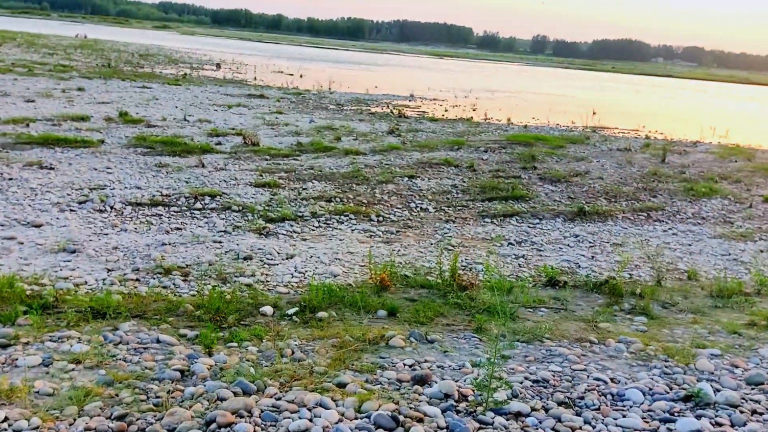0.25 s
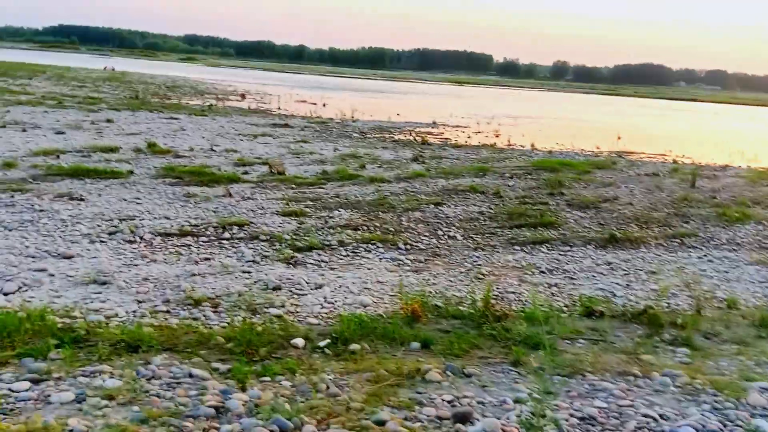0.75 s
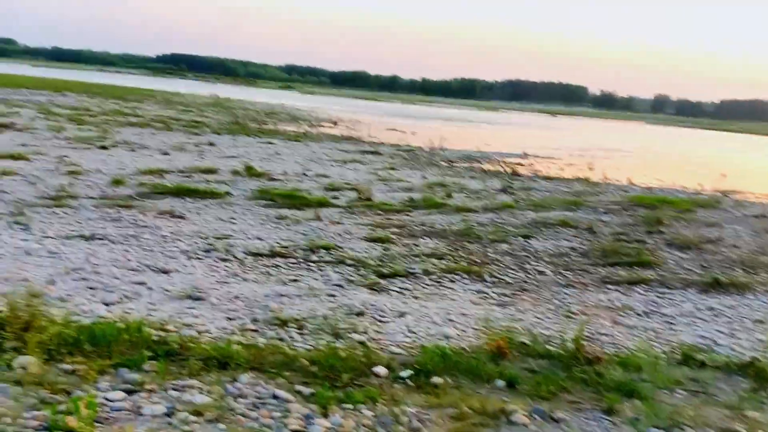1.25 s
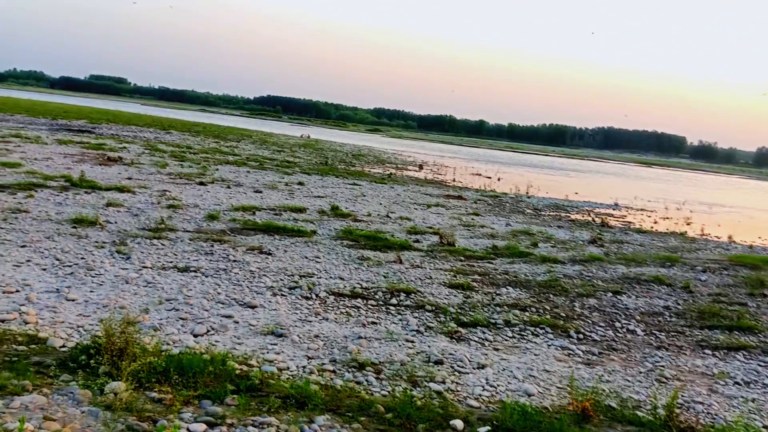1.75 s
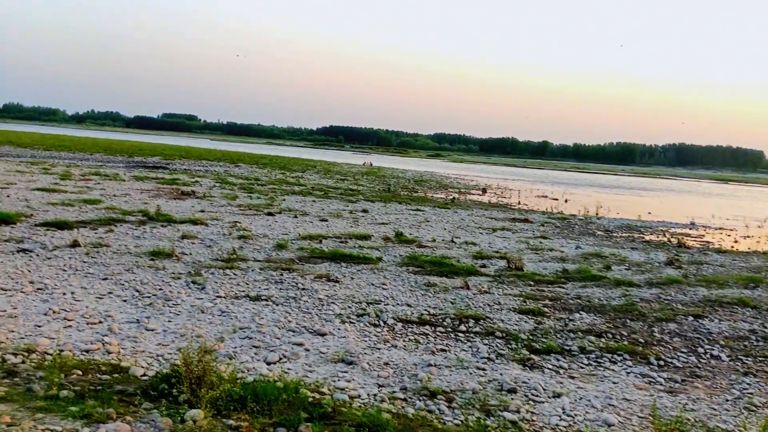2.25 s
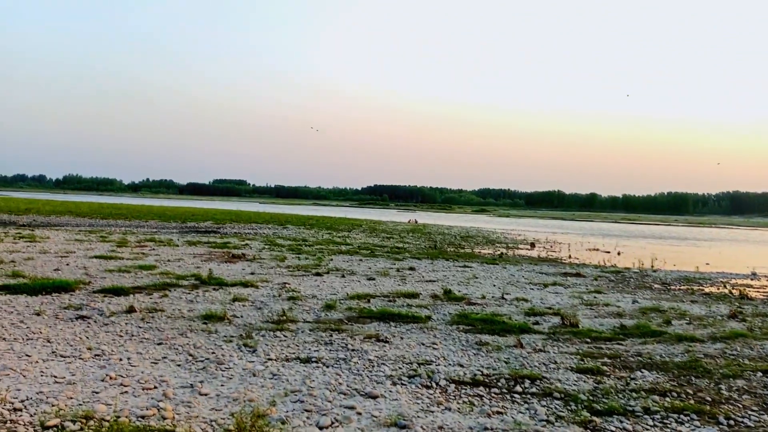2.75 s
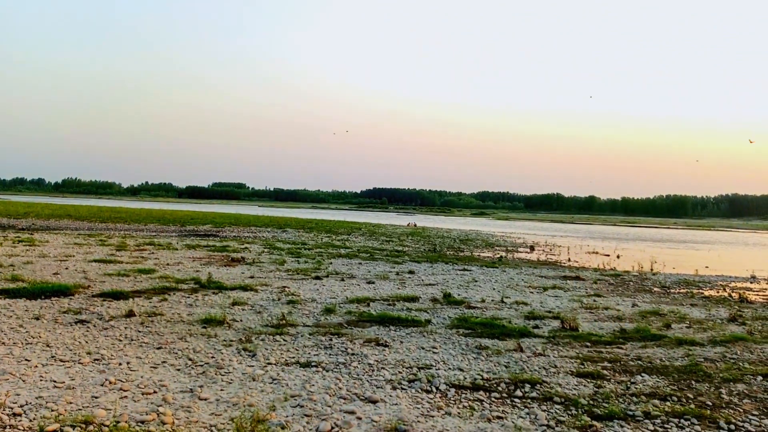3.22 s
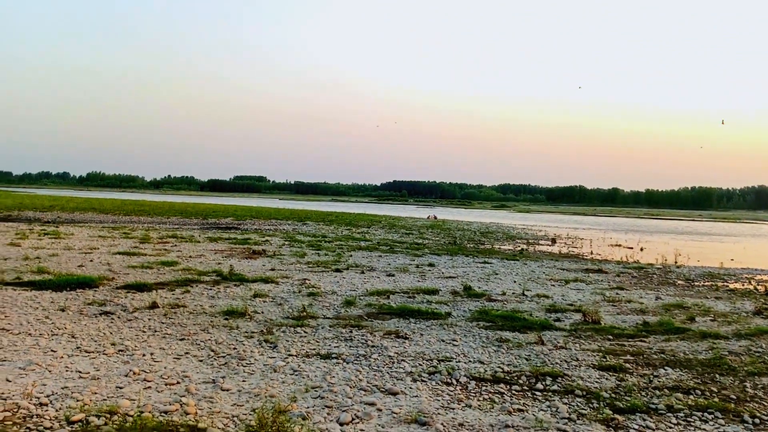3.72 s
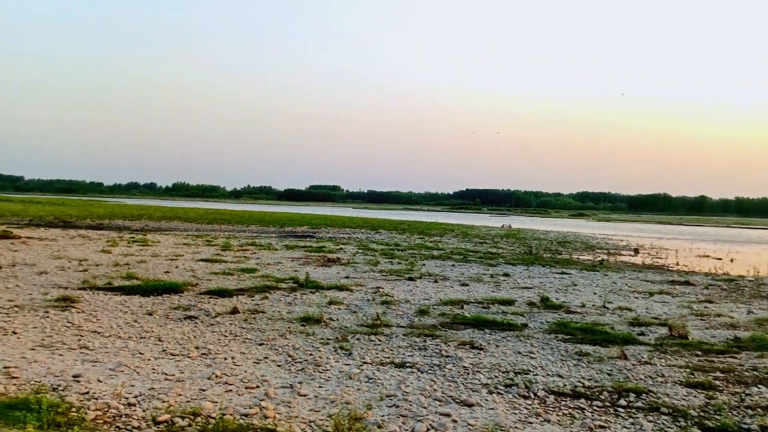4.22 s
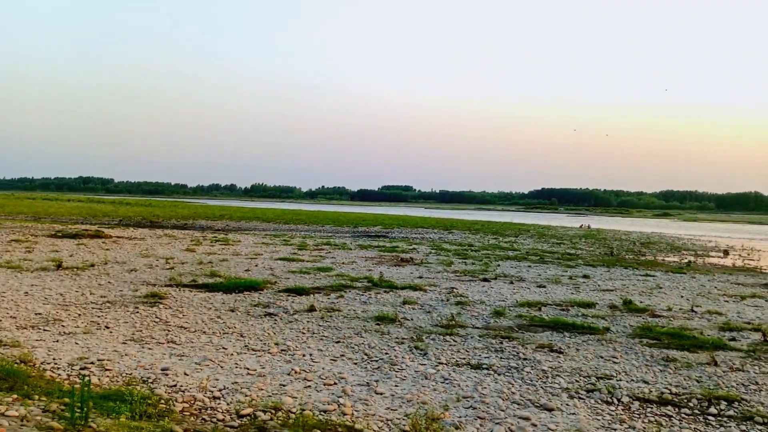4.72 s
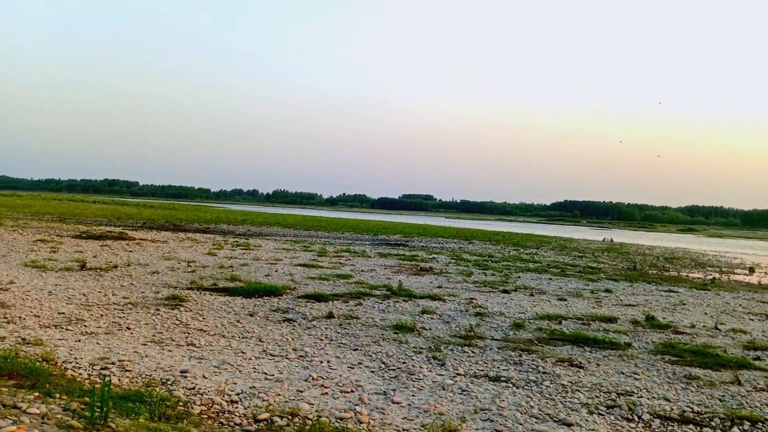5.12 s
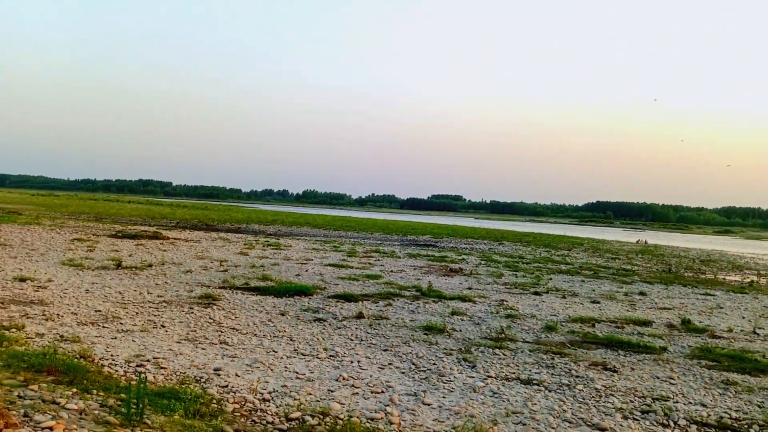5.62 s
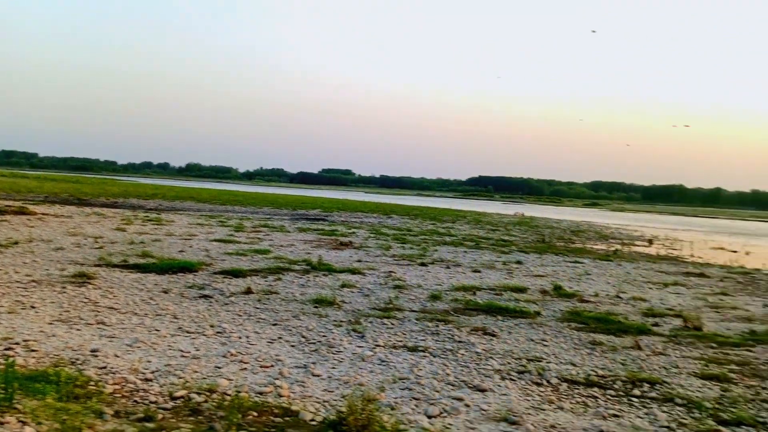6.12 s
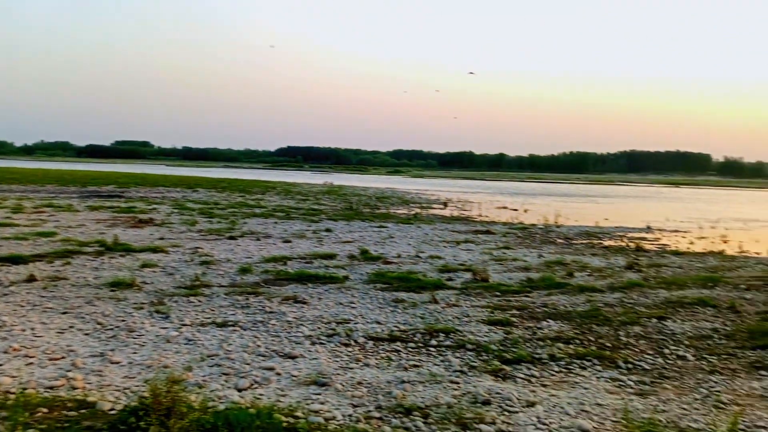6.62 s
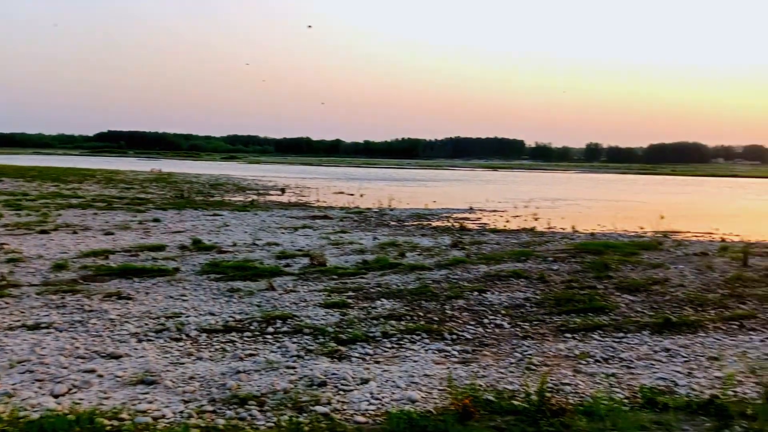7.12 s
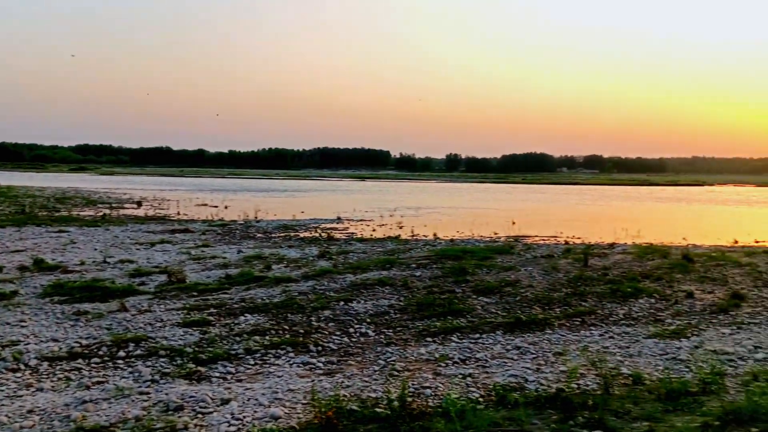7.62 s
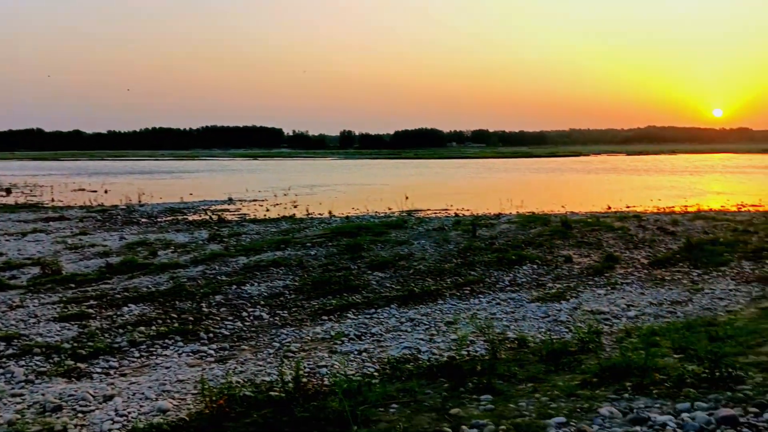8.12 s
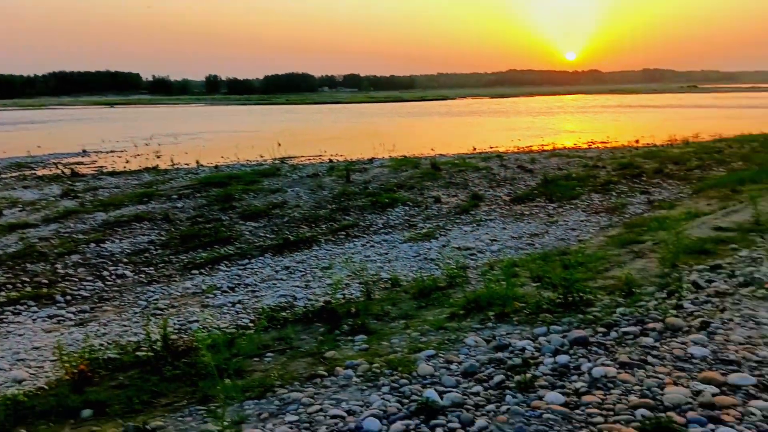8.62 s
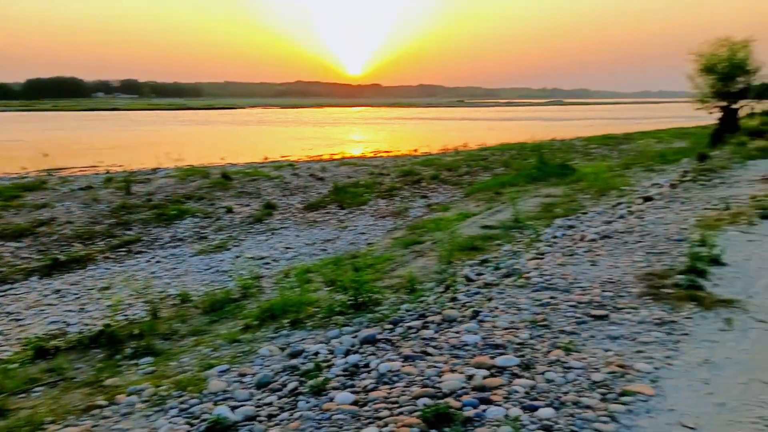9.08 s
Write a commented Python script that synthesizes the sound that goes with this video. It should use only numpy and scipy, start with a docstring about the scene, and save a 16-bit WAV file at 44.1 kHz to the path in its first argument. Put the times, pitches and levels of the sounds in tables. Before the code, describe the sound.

Harsh squawks and piercing bird calls overlap across a river at dusk, while crickets buzz and gusts rumble and howl at the microphone.

```python
"""Harsh cries of a far water-bird colony overlap at dusk on a gravel river bank: rough tones over a chance murmur.
Bush crickets buzz as pulsed narrow noise over the coloured noise of river and distant air. Gusts rumble and howl
low in the phone's microphone port; close by, brushing noise, short pebble knocks and dull hand bumps.
Thin squeaks arch up on nearly clean tones, and later one small bird whistles two falling notes."""
import sys
import numpy as np
from scipy import signal
from scipy.fft import rfft, irfft
from scipy.io import wavfile
from scipy.ndimage import uniform_filter1d

SR = 44100
rng = np.random.default_rng(int(sys.argv[2]) if len(sys.argv) > 2 else 0)


def bounce(signal):
    """Save signal as a 16-bit WAV file at the path given by the first command-line argument."""
    frames = np.transpose(np.atleast_2d(signal))
    limited = np.clip(frames, -1, 1)
    pcm = np.round(limited * 32767).astype(np.int16)
    wavfile.write(sys.argv[1], SR, pcm)


def volts(x):
    """Linear amplitude factor 10**(x/20) for a level x in dB, scalar or array-like."""
    e = np.asarray(x, float) / 20
    return 10 ** e


N = 412335  # samples


def in_time(rows, outside=None):
    """Columns joined by straight lines over time, one value a sample."""
    s, *columns = np.transpose(rows)
    return [np.interp(np.arange(N) / SR, s, c, left=outside, right=outside) for c in columns]


def rms_one(x):
    """Scale to rms 1."""
    return x / np.sqrt(np.mean(x ** 2) + 1e-20)


def band(x, low_hz, high_hz, order=2):
    """Butterworth band-pass."""
    return signal.sosfilt(signal.butter(order, [low_hz, high_hz], "band", fs=SR, output="sos"), x)


def drift(rate_hz, size=N):
    """Chance that wanders about rate_hz times a second: twice-smoothed noise of rms 1."""
    r = np.exp(-2 * np.pi * rate_hz / SR)
    settling = 4000  # samples thrown away
    wander = signal.lfilter([1], [1, -2 * r, r * r], rng.standard_normal(size + settling))
    return rms_one(wander[settling:])


def coloured(spectrum, low_hz, high_hz):
    """Noise with the given spectrum (Hz, relative dB), rms 1 between low_hz and high_hz."""
    hz = np.fft.rfftfreq(N, 1 / SR) + 1
    at, level_db = np.transpose(spectrum)
    gain = volts(np.interp(np.log(hz), np.log(at), level_db))
    x = irfft(rfft(rng.standard_normal(N)) * gain, N)
    return x / np.sqrt(np.mean(band(x, low_hz, high_hz) ** 2))


def mottled(x, spread_db):
    """Sound made uneven: its level varies by chance in small patches of pitch and time."""
    spectrum = signal.stft(x, nperseg=512)[2]
    chance = uniform_filter1d(rng.standard_normal(spectrum.shape), size=3, axis=0)
    chance = uniform_filter1d(chance, size=6, axis=1)
    return signal.istft(spectrum * volts(spread_db * rms_one(chance)), nperseg=512)[1][:N]


def harsh_voice(hz, rough_hz, throb_hz, depth):
    """A tone whose pitch jitters, wider and faster the rougher, and whose level throbs as the membranes flap."""
    size = len(hz)
    jittered_hz = hz + rough_hz * drift(50 + rough_hz, size)
    tone = np.sin(2 * np.pi * np.cumsum(jittered_hz) / SR)
    throb_turns = np.cumsum(throb_hz * (1 + 0.074 * drift(24.0, size))) / SR + rng.random()
    throb = 1 + depth * np.sin(2 * np.pi * throb_turns)
    return rms_one(tone * throb * volts(1.7 * drift(38.0, size)))


def cries(table):
    """Each partial comes in fast, bends in pitch and fades."""
    out = np.zeros(N + SR)
    for start, length, first_hz, last_hz, level_db, rough_hz in table:
        part = np.arange(round(length * SR)) / (length * SR)
        hz = first_hz + (last_hz - first_hz) * (1 - (1 - part) ** 1.3)  # bends most at first
        # a quick onset (slower for raspy partials) to most of the strength, then a swell
        onset = np.minimum(part * length / (0.0023 + rough_hz / 63000.0), 1)
        swell = np.minimum(0.88 + part / 0.9, 1)
        fade = np.minimum((1 - part) / 0.4, 1)
        voice = harsh_voice(hz, max(rough_hz, 5), throb_hz=rng.uniform(64, 78), depth=0.5)
        out[round(start * SR):][:len(part)] += volts(level_db) * onset * swell * fade * voice
    return out[:N]


def plain_cries():
    """Cries of a single tone, rougher the higher they are pitched."""
    # one-tone cries: start_s, length_s, first_hz, last_hz, level_db
    plain = [(0.0, 0.16, 1984, 1825, -44.5), (0.761, 0.047, 1414, 1444, -44.5),
             (0.809, 0.21, 1773, 1700, -48.5), (1.105, 0.068, 1358, 1466, -39),
             (1.108, 0.093, 1905, 2085, -45), (1.509, 0.11, 4880, 4980, -63),
             (1.698, 0.27, 1351, 1685, -39.5), (1.787, 0.15, 1093, 1016, -52.5),
             (2.366, 0.39, 1640, 1705, -49), (2.553, 0.39, 1357, 1386, -41.5),
             (2.568, 0.17, 2353, 2840, -45.5), (2.842, 0.17, 1226, 1007, -39),
             (2.881, 0.16, 1557, 1437, -42.5), (3.036, 0.16, 1467, 1493, -45.5),
             (3.21, 0.1, 1425, 1405, -43), (3.3, 0.21, 1420, 1218, -50), (3.658, 0.12, 1533, 1612, -45),
             (4.12, 0.13, 1605, 1567, -36.5), (4.259, 0.24, 1860, 1760, -46.5),
             (4.288, 0.092, 1480, 1520, -48.5), (4.4, 0.077, 2690, 2670, -57),
             (4.552, 0.21, 1870, 1920, -42.5), (4.671, 0.06, 1560, 1460, -33),
             (5.14, 0.08, 1480, 1454, -50), (5.614, 0.12, 970, 985, -51.5), (5.83, 0.2, 1477, 1378, -50.5),
             (6.082, 0.23, 1465, 1440, -50.5), (6.471, 0.15, 1422, 1400, -46),
             (6.941, 0.084, 910, 883, -47.5), (7.058, 0.17, 1666, 1900, -46.5),
             (7.232, 0.21, 1663, 1563, -45), (7.417, 0.072, 2720, 2760, -51.5),
             (7.714, 0.092, 1937, 1890, -44.5), (7.956, 0.2, 1517, 1507, -42.5),
             (7.973, 0.17, 1805, 2054, -41), (8.123, 0.14, 1270, 1326, -46.5),
             (8.213, 0.089, 888, 858, -51), (8.531, 0.27, 1728, 1800, -49), (8.969, 0.11, 1905, 1900, -41),
             (9.21, 0.13, 1916, 1970, -48.5)]
    return [(s, length, first, last, db, 0.021 * first) for s, length, first, last, db in plain]


def squawks():
    """Harsh squawks: a cluster of rough tones around the pitch, with raspy tones well above it."""
    # squawks: start_s, length_s, first_hz, last_hz, level_db, rasp_db (relative to level_db)
    calls = [(0.222, 0.22, 1784, 1761, -44.5, -37), (1.66, 0.29, 1780, 1850, -43.5, -25),
             (2.641, 0.4, 1900, 1600, -40, -24.5), (3.294, 0.23, 1763, 1763, -39.5, -32),
             (3.921, 0.29, 1804, 1944, -47.5, -33), (4.667, 0.35, 1910, 1690, -37, -40.5),
             (5.474, 0.29, 1882, 1687, -41.5, -32), (5.698, 0.33, 1873, 1780, -46, -28),
             (6.597, 0.24, 1782, 1887, -44.5, -24), (6.851, 0.27, 1816, 1750, -35.5, -21),
             (7.251, 0.36, 1900, 1790, -43.5, -28), (7.499, 0.29, 1828, 1730, -34.5, -27.5),
             (8.125, 0.26, 1825, 1740, -34.5, -38)]
    # cluster: share of the pitch, level_db (relative), roughness_hz, share of length left out at each end
    cluster = [(0.81, -4.5, 60, 0.06), (1.0, 1, 50, 0.0), (1.14, -6.5, 65, 0.1), (1.26, -15, 70.6, 0.22)]
    # rasp: the same columns
    rasp = [(1.8, -6, 90, 0.15), (2.25, -5.5, 70, 0.05), (2.5, -6, 70, 0.1), (3.1, -3.5, 70, 0.1),
            (3.55, -4, 60, 0.05), (2.6, -2.5, 1196, 0.01)]
    tones = []
    for s, length, first, last, db, rasp_db in calls:
        for group, group_db in [(cluster, db), (rasp, db + rasp_db)]:
            tones += [(s + wait * length, (1 - 2 * wait) * length, k * first, k * last, group_db + tone_db, rough)
                      for k, tone_db, rough, wait in group]
    return tones


def piercing_cries():
    """Cries with two overtones, the octave and a twelfth 15 dB weaker than the octave."""
    # piercing cries: start_s, length_s, first_hz, last_hz, level_db, octave_db (relative to level_db)
    piercing = [(1.722, 0.17, 1890, 2014, -49.5, -7), (2.6, 0.23, 1953, 2250, -45, -6),
                (3.296, 0.147, 2140, 2220, -40.5, -14.5), (6.611, 0.14, 2225, 2293, -44, -13),
                (6.874, 0.146, 1980, 2100, -38, -22), (7.508, 0.21, 2030, 2230, -47.5, -9),
                (8.102, 0.26, 1994, 2097, -50.5, -17)]
    tones = []
    for s, length, first, last, db, octave_db in piercing:
        levels = [db, db + octave_db, db + octave_db - 15.0]
        tones += [(s, length, k * first, k * last, level, 60.0) for k, level in enumerate(levels, 1)]
    return tones


def far_cries(count, low_hz, high_hz, length_s, level_db):
    """Chance cries from the far end of the colony, up to 8.6 dB below level_db."""
    when, long, pitch, bend, loud = rng.random((count, 5)).T
    hz = low_hz * (high_hz / low_hz) ** pitch
    last_hz = hz * (1 + 0.0815 * (bend - 0.5))
    rough_hz = 25 + 0.0081 * hz
    return np.transpose([when * N / SR, length_s * (0.5 + long), hz, last_hz, level_db - 8.6 * loud, rough_hz])


def colony():
    """Near cries, the far murmur with a faint higher twitter, and weaker echoes off the other bank."""
    # how busy the far colony is: time_s, gain_db
    bustle = [(0, 2.5), (0.6, -2.5), (1.3, 0.5), (2.2, -3.5), (3.0, -1.5), (4.3, 3), (5.25, -2), (5.8, 4.5),
              (6.3, -4.5), (7.2, 2.1), (7.9, 1.5), (8.7, -1), (9.35, -1.5)]
    murmur = cries(far_cries(count=220, low_hz=1313, high_hz=2100, length_s=0.122, level_db=-53.0))
    murmur = volts(in_time(bustle)[0]) * murmur
    twitter = cries(far_cries(count=420, low_hz=2250, high_hz=6890, length_s=0.042, level_db=-74.5))
    voices = cries(plain_cries() + squawks() + piercing_cries()) + murmur + twitter
    echoes = sum(volts(db) * np.roll(voices, round(s * SR)) for s, db in [(0.013, -12), (0.047, -9)])
    return voices + echoes


def cricket(strokes_hz, low_hz, high_hz, gap_db):
    """Each wing stroke is a noise burst of tooth strikes in the wing's narrow band, with a second return stroke."""
    turn = 2 * np.pi * (np.cumsum(strokes_hz * (1 + 0.012 * drift(5.1))) / SR + rng.random())
    stroke = volts(gap_db * (np.cos(turn) - 1) / 2)
    return_stroke = 0.61 * volts(gap_db * (np.cos(turn - 2.4) - 1))  # weaker and narrower
    strikes = (stroke + return_stroke) * rng.standard_normal(N)
    return rms_one(band(strikes, low_hz, high_hz, order=4)) * volts(2.0 * drift(8.5))


def crickets():
    """Two singers share the low band, a third sings higher, a fourth is barely there."""
    # levels of the buzz as heard at the microphone, dips included: time_s, low_singers_db, high_singer_db
    buzz_levels = [(0, -54, -76), (.45, -56, -60), (.65, -53, -77), (1.15, -53.5, -76), (1.24, -69, -84),
                   (1.55, -51, -63), (2.08, -62.5, -71), (2.42, -50.5, -74), (3.1, -55, -69.5),
                   (3.4, -50, -66), (4.55, -50, -68), (4.84, -55.5, -78), (5.25, -51, -68), (6.5, -49, -62),
                   (7.71, -51.5, -66), (8.0, -47.5, -61.5), (8.5, -51.5, -60.5), (8.7, -49, -76),
                   (9.1, -47, -59.5)]
    low_db, high_db = in_time(buzz_levels)
    low = cricket(66.2, low_hz=7410, high_hz=8090, gap_db=16.0)
    low = low + 0.73 * cricket(62.5, low_hz=7272, high_hz=7980, gap_db=7)
    high = cricket(60.8, low_hz=9020, high_hz=9580, gap_db=14.0)
    faint = cricket(57.0, low_hz=10700, high_hz=10930, gap_db=10)
    singers = volts(low_db) * rms_one(low) + volts(high_db) * (high + volts(-17.5) * faint)
    return mottled(singers, spread_db=1.0)


def distant_air():
    """River and distant air: coloured noise whose level moves slowly, mottled in pitch and time."""
    # spectrum: frequency_hz, level_db per Hz (relative)
    air_spectrum = [(100, -14), (160, 0.5), (260, -9), (1050, -13), (1500, -6), (1900, -8), (2600, -18),
                    (6300, -28.5), (9000, -25), (10500, -34.5), (15800, -40.5)]
    # course of the level, ahead of a 3.5 dB cut: time_s, level_db
    air_level = [(0, -66), (2.4, -65), (3.6, -63), (5.2, -62), (5.8, -59.5), (7.4, -61), (8.4, -63.5),
                 (9.35, -63.5)]
    hiss = mottled(coloured(air_spectrum, 2865, 7400), spread_db=4.0)
    return volts(in_time(air_level)[0] - 3.5) * hiss


def gust(start, length):
    """A gust catches and lets go of the port within a few hundredths of a second."""
    t = np.arange(N) / SR
    return np.clip(np.minimum(t - start, start + length - t) / 0.028, 0, 1)


def wind_rumble():
    """Lumpy turbulence at the microphone port: low noise under gusts and a faint steady breeze."""
    # rumbling gusts: start_s, length_s, level_db
    gusts = [(0.08, 0.24, -51), (0.731, 0.18, -44.5), (1.224, 0.18, -53), (2.554, 0.25, -42),
             (3.571, 0.38, -36.5), (4.088, 0.43, -38.5), (4.543, 0.65, -37), (5.385, 0.3, -42),
             (5.717, 0.56, -38), (6.589, 0.14, -45), (6.85, 0.099, -54), (7.299, 0.26, -36.5),
             (7.62, 0.18, -40.5), (7.824, 0.25, -39), (8.31, 0.12, -45), (8.873, 0.23, -44.5)]
    # turbulence spectrum: frequency_hz, level_db per Hz (relative)
    turbulence = [(18, -72.5), (30, -33.5), (128, 3.5), (169, -2), (260, -28.5), (340, -60), (570, -120)]
    breeze = volts(-57.5 + 1.77 * drift(6.7))
    blown = sum(volts(db) * gust(s, length) for s, length, db in gusts) + breeze
    return blown * volts(2.0 * drift(8.0)) * coloured(turbulence, 54, 260)


def wind_howls():
    """Stronger gusts make the port howl: noise in a narrow band, over a faint howl that wavers in level."""
    # howling gusts: start_s, length_s, level_db, pitch_hz
    gusts = [(1.896, 0.17, -36.5, 342), (1.981, 0.037, -42.5, 690), (2.055, 0.29, -44.5, 329),
             (3.525, 0.12, -52.5, 326), (3.875, 0.069, -52, 620), (4.64, 0.11, -57.5, 323),
             (5.061, 0.18, -45.5, 646), (5.29, 0.14, -57.5, 335), (5.436, 0.81, -43.5, 336),
             (5.83, .08, -56, 620), (6.592, 0.12, -51, 338), (6.858, 0.55, -40, 345),
             (7.49, 0.062, -44, 330), (7.621, .21, -40, 349), (7.91, 0.14, -59.5, 342)]
    white = rng.standard_normal(N) * volts(0.82 * drift(8.4))
    howls = np.zeros(N)
    for s, length, db, hz in gusts:
        howls += volts(db) * gust(s, length) * rms_one(band(white, 0.907 * hz, 1.028 * hz))
    calm = volts(-67.5 + 5.0 * drift(3.0)) * rms_one(band(white, 282, 355))
    return howls + calm


def brushing():
    """Sleeve, hand and grass brush close to the microphone: grainy noise with a high sheen and a lower body."""
    # brushes: start_s, length_s, sheen_db, body_db (relative to sheen_db)
    brushes = [(0.09, 0.039, -66, -12), (.15, 0.09, -66, -16), (0.294, 0.062, -56, -12.5),
               (0.357, 0.064, -57, -11.5), (0.515, 0.1, -68, -17), (0.745, 0.07, -61.5, -13),
               (1.127, 0.1, -64, -5.5), (1.48, 0.3, -69.5, -7), (1.83, 0.67, -66.5, -11.5),
               (1.868, 0.51, -72.5, 2.5), (1.968, 0.083, -71, 6), (5.98, 0.52, -66.5, -12)]
    # cloth spectrum: frequency_hz, level_db per Hz (relative)
    cloth_spectrum = [(500, -12.5), (1800, -5), (3000, -22.5), (5100, -9), (7000, -18), (15800, -33.5)]
    t = np.arange(N) / SR
    grain = volts(2.0 * drift(300) + 2.0 * drift(13))
    noise = grain * coloured(cloth_spectrum, 10000, 17700)
    body, sheen = band(noise, 420, 9300), band(noise, 8340, 14900)
    cloth = np.zeros(N)
    for s, length, db, body_db in brushes:
        rise, fall = (t - s) / (0.006 + 0.065 * length), (s + length - t) / (0.23 * length)
        stroke = np.clip(np.minimum(rise, fall), 0, 1)
        cloth += volts(db) * stroke * (sheen + volts(body_db) * body)
    return cloth


def pebbles():
    """Pebbles knock: a noise crack with a short gritty tail."""
    # knocks, ahead of the band-pass: start_s, level_db
    pebble_knocks = [(0.45, -42), (0.7903, -34.5), (1.174, -33)]
    knocks, t = np.zeros(N + SR), np.arange(SR // 10) / SR
    burst = np.exp(-t / 0.0008) + volts(-11) * np.exp(-t / 0.012)
    for s, level_db in pebble_knocks:
        knocks[round(s * SR):][:len(t)] += volts(level_db) * burst * rng.standard_normal(len(t))
    return band(knocks[:N], 3500, 11800)


def hand_bumps():
    """Blunt bumps of the hand: a low tone that swells and dies within a tenth of a second."""
    # bumps: start_s, level_db (the swell adds some), pitch_hz
    thumps = [(0.525, -43.5, 80.6), (0.746, -61, 111), (1.346, -40, 64.4), (4.919, -39, 72),
              (7.644, -36.5, 84), (8.882, -36, 80)]
    bumps, t = np.zeros(N + SR), np.arange(SR // 5) / SR
    swell = (t / 0.0098) * np.exp(1 - t / 0.015)
    for s, level_db, hz in thumps:
        bumps[round(s * SR):][:len(t)] += volts(level_db) * np.sin(2 * np.pi * hz * t) * swell
    return bumps[:N]


def squeaks():
    """Thin high squeaks: nearly clean tones that arch up and drop back, with a fainter twin above."""
    # squeaks: start_s, length_s, first_hz, top_hz, level_db
    high_squeaks = [(0.677, 0.09, 10500, 11500, -68), (0.82, 0.15, 11100, 12100, -72),
                    (1.36, 0.38, 8150, 8800, -62.5)]
    out = np.zeros(N)
    for start, length, first_hz, top_hz, level_db in high_squeaks:
        part = np.arange(round(length * SR)) / (length * SR)
        hz = top_hz - (top_hz - first_hz) * np.abs(part / 0.75 - 1) ** 1.3  # peaks at 0.75 of the length
        twin = volts(-13) * harsh_voice(1.12 * hz, 30.0, 40.0, 0.3)
        pair = harsh_voice(hz, 30.0, 39.0, 0.35) + twin
        out[round(start * SR):][:len(part)] += volts(level_db) * np.sqrt(np.sin(np.pi * part)) * pair
    return out


def whistle():
    """The small bird: a clean tone in two falling notes, its strength trembling."""
    # falling whistle: time_s, pitch_hz, level_db
    notes = [(2.9, 5620, -64), (2.925, 5550, -56), (3.0, 4560, -41), (3.05, 4430, -52), (3.085, 4380, -78),
             (3.12, 4140, -47.5), (3.17, 3970, -49), (3.225, 3800, -71)]
    hz = in_time(notes)[0]
    level_db = in_time(notes, outside=-120)[1]
    strength = uniform_filter1d(volts(level_db + 3.8 * drift(60)), size=200)
    return np.sqrt(2) * strength * np.sin(2 * np.pi * np.cumsum(hz) / SR)


def scene():
    """The colony, the grass, the wind and the hands together at one microphone."""
    far = colony() + crickets() + distant_air()
    close = wind_rumble() + wind_howls() + brushing() + pebbles() + hand_bumps()
    return (far + close + squeaks() + whistle())[None]


def roll_off(x):
    """The treble ends steeply here."""
    return signal.sosfilt(signal.butter(12, 15910, fs=SR, output="sos"), x)


def record(dry):
    """The finished mix as the phone keeps it."""
    return roll_off(dry)


dry = scene()
out = record(dry)
bounce(out)
```